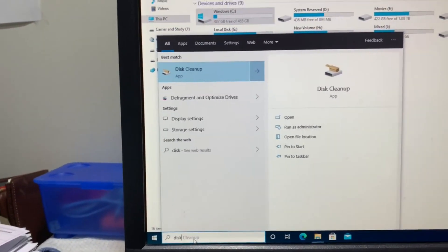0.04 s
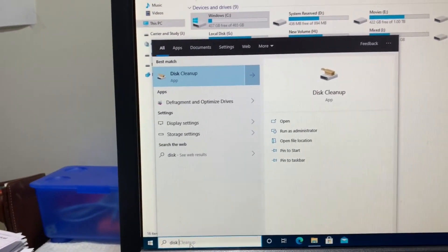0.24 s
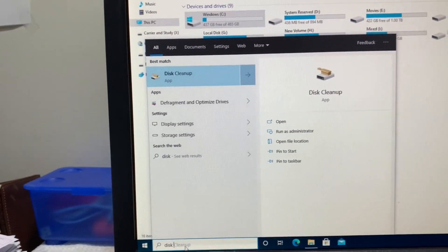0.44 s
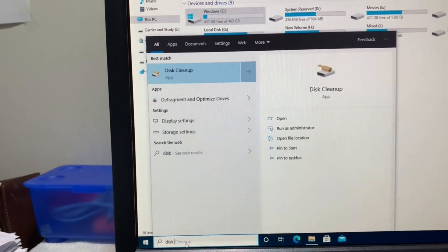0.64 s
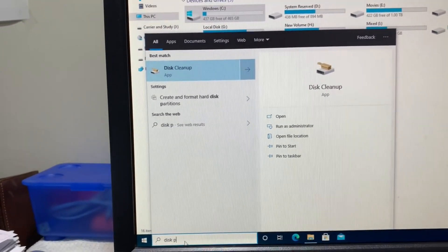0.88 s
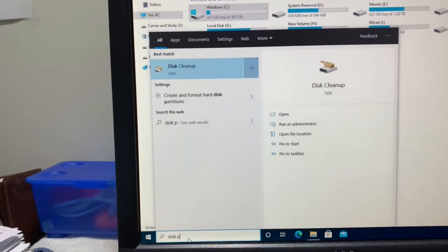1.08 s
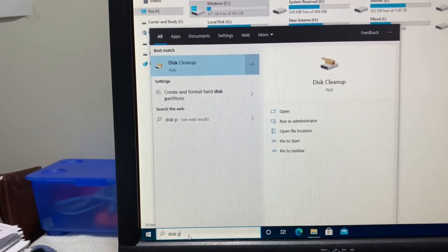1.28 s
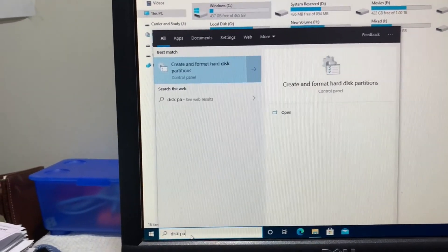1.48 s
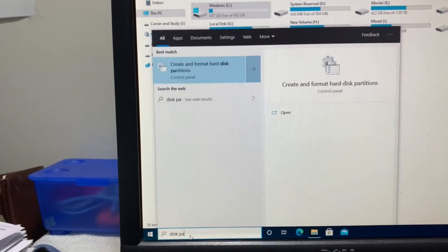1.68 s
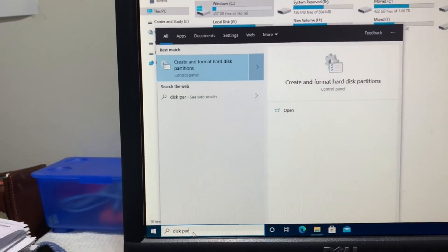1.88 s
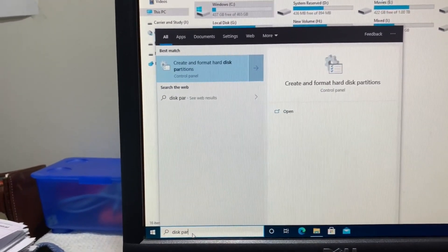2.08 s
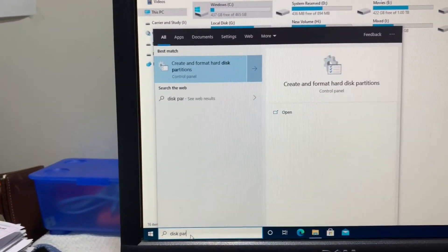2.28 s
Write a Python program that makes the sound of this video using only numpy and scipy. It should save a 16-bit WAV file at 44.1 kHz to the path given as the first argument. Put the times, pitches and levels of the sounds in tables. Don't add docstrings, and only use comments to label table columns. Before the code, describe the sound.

A few computer keys are pressed one after another, each with a sharp knock, loose rattle and dull desk thud, over low room rumble, soft hiss and faint fan whine, picked up close in stereo.

```python
import sys
import numpy as np
from scipy import signal
from scipy.fft import rfft, irfft, next_fast_len
from scipy.io import wavfile
from scipy.ndimage import uniform_filter1d, map_coordinates

SR = 44100
rng = np.random.default_rng(int(sys.argv[2]) if len(sys.argv) > 2 else 0)


def wrap_up_sound(samples):
    columns = np.atleast_2d(samples).T
    tamed = np.clip(columns, -1, 1)
    steps = np.round(tamed * 32767).astype(np.int16)
    wavfile.write(sys.argv[1], SR, steps)


def natural_amplitude(level_db):
    exponent = np.asarray(level_db, float) / 20
    return 10 ** exponent


N = 102664


def unit(x):
    return x / np.sqrt(np.mean(x ** 2) + 1e-20)


def along(points, hz):
    f, value = np.transpose(points)
    return np.interp(np.log(hz + 1), np.log(f + 1), value)


def wobble(rate):
    knots = rng.standard_normal(int(N * rate / SR) + 4)
    return map_coordinates(knots, [np.arange(N) * rate / SR])


def filtered(x, response):
    n = x.shape[-1]
    m = next_fast_len(n + min(n, SR // 2))
    return irfft(rfft(x, m) * response(np.fft.rfftfreq(m, 1 / SR)), m)[..., :n]


def body(modes, shift=1, change_db=0, top_hz=30000, foot_hz=1):
    center, width, db = np.transpose(modes)[:, :, None]
    sign = (-1) ** np.arange(len(center))[:, None]
    gain = natural_amplitude(db + np.reshape(change_db, (-1, 1))) * sign
    center = center * np.reshape(shift, (-1, 1))

    def response(f):
        ring = gain * 1j * f * width / (center * center - f * f + 1j * f * abs(width))
        dull = 1 / (1 + 1j * f / top_hz) ** 3
        thin = (f / (f - 1j * foot_hz)) ** 3
        return ring.sum(0) * dull * thin
    return response


def rush(spectrum, alike):
    def response(hz):
        turn = np.arccos(np.clip(along(alike, hz), -1, 1)) / 2
        return natural_amplitude(along(spectrum, hz)) * [np.cos(turn), np.sin(turn)]
    mid, side = filtered(rng.standard_normal((2, N)), response)
    return unit(np.array([mid + side, mid - side]))


def add(track, s, sound):
    track[round(s * SR):][:len(sound)] += sound


def knocks(rows):
    out, t = np.zeros(N + SR), np.arange(SR // 3) / SR
    for s, db, hz, t60 in rows:
        start = 1 - np.exp(-t * hz * 2)
        add(out, s, -natural_amplitude(db - 60 * t / t60) * np.sin(2 * np.pi * hz * t) * start)
    return out[:N]


# (pitch [Hz], level [dB per Hz])
AIR = [(12, -40.5), (20, -8.5), (75, -0.5), (145, -8.5), (188, -11), (225, -21.5), (274, -19.5), (387, -34),
       (1000, -41), (1300, -33.5), (2200, -120)]
# (pitch [Hz], level [dB per Hz])
HISS = [(410, -40), (700, -10), (737, -21.5), (1280, -7.5), (1450, -35.5), (13300, -27), (15800, -24.5)]
# (pitch [Hz], level [dB], unsteadiness [Hz])
WHINE = [(1271, -86, 14), (772, -98, 5.5)]
# (pitch [Hz], likeness [0-1])
ALIKE = [(60, 1), (250, 0.7), (700, 0.4), (3000, .02)]


def quiet_room():
    air_db, hiss_db, whine_sway_db = -55.5, -79.5, 2.5
    t = np.arange(N) / SR
    rumble = natural_amplitude(air_db + 1.5 * wobble(11.0)) * rush(AIR, ALIKE)
    hiss = natural_amplitude(hiss_db) * rush(HISS, ALIKE)
    fan = np.zeros(N)
    for hz, db, width in WHINE:
        turns = hz * t + np.cumsum(wobble(25.55)) * width / SR
        fan += natural_amplitude(db + whine_sway_db * wobble(8.0)) * np.sin(2 * np.pi * turns)
    return rumble + hiss + fan


# (time [s], level [dB])
SLIDE = [(0.0, -76), (0.07, -86.5), (0.238, -76), (0.63, -94), (0.74, -85.5), (0.918, -74), (1.04, -86.5),
         (1.13, -84.5), (1.27, -82), (1.36, -87.5), (1.71, -83), (1.87, -89.5), (2.32, -89)]
# (pitch [Hz], level [dB per Hz])
SKIN = [(290, -18.5), (500, -14.5), (611, -9.5), (2760, -12.5), (6180, -23.5), (9240, -21.5), (10800, -22),
        (12500, -24), (15500, -24.5)]


def slide():
    slide_db, grain_db = 9, 1.2
    s, db = np.transpose(SLIDE)
    level = np.interp(np.arange(N) / SR, s, db)
    above = np.sqrt(np.clip(natural_amplitude(2 * level) - natural_amplitude(2 * db.min()), 0, None))
    grain = natural_amplitude(slide_db + grain_db * wobble(39.6))
    return above * grain * rush(SKIN, [(500, 0.27), (3000, 0.055)])


# (time [s], level [dB], pitch [Hz], time to fall 60 dB [s])
TICKS = [(.0155, -46, 2360, 0.016), (.0222, -52, 1180, 0.0047), (.1175, -31.5, 1800, 0.0085),
         (.1297, -25.5, 985, 0.014), (.1345, -24, 1424, 0.024), (.139, -23.5, 1455, 0.0091),
         (.5005, -39, 2860, 0.014), (.5012, -51, 3450, 0.022), (.506, -38.5, 1400, 0.01),
         (.5255, -47.5, 3300, 0.027), (.5305, -31.5, 735, 0.024), (.6435, -58, 3210, 0.061),
         (.6582, -40, 920, 0.015), (.6675, -42.5, 3220, 0.019), (.6676, -33.5, 9330, 0.0062),
         (1.0822, -28.5, 3290, 0.0054), (1.0821, -34.5, 3930, 0.0058), (1.0838, -32.5, 2880, 0.0051),
         (1.088, -46.5, 2950, 0.035), (1.0882, -41, 944, 0.018), (1.159, -41, 1050, 0.016),
         (1.2895, -37.5, 3390, 0.0085), (1.299, -36.5, 1240, 0.013), (1.5605, -44, 4300, 0.013),
         (1.2985, -41, 8700, 0.009), (1.629, -25.5, 1116, 0.0092), (1.629, -36, 1630, 0.01),
         (1.7147, -18.5, 1800, 0.0017), (1.7284, -21.5, 860, 0.0037), (1.909, -62, 3400, 0.03)]


def ticks():
    return knocks(TICKS)


# (time [s], cap level [dB], case over cap [dB], stem fizz over cap [dB], rattle
# length [s])
CONTACTS = [(0.0169, -56.5, 8.5, -3, 0.0054), (0.0204, -53.5, 15, -33, 0.014),
            (0.0353, -55.5, 14.5, -27, 0.0019), (0.0496, -71, 22, -47, 0.01),
            (0.074, -58, 13, -43.5, 0.0043), (0.092, -56, 11, -24, 0.011),
            (0.116, -47.5, -7.5, -30.5, 0.0018), (0.1306, -32.5, 3.5, 1.5, 0.0016),
            (0.1326, -32.5, 1.5, 5.5, 0.0051), (0.14, -39.5, 2.5, 2, 0.0069),
            (0.492, -59.5, -1, -7.5, 0.0066), (0.5025, -49, -1.5, -11.5, 0.006),
            (0.523, -52.5, 2, -15, 0.012), (0.5332, -52.5, 6, -27, 0.0022), (0.55, -61, 11.5, -17, 0.0037),
            (0.562, -68.5, 15.5, -30, 0.0038), (0.581, -66.5, 16.5, -22.5, 0.01),
            (0.642, -62.5, 3, -14, 0.006), (0.657, -48.5, 0, -13, 0.0033), (0.6676, -46, 8, 3.5, 0.0016),
            (0.671, -63, 12, -2.5, 0.006), (1.0814, -42, -9.5, -17, 0.0018),
            (1.087, -43.5, -16, -23, 0.0026),
            (1.1319, -59.5, 4, -22.5, 0.0094), (1.1535, -52, 1.5, -5, 0.012), (1.1531, -53.5, 4.5, -25, 0.005),
         (1.1738, -52.5, 1.5, -9.5, 0.0063), (1.2042, -55, 9, -39, 0.0038), (1.2404, -61, 7.5, -37, 0.0052),
         (1.2504, -63, 10.5, -23, 0.0087), (1.264, -52, 2, -13, 0.0053), (1.275, -50, -1.5, -13, 0.012),
         (1.289, -47, 0, -13, 0.0096), (1.2977, -50, 2.5, -10, 0.0023), (1.307, -58.5, 15, -15.5, 0.0052),
         (1.3208, -55, -7, -14, 0.004), (1.5454, -43.5, 3, -9.5, 0.0053), (1.5578, -42.5, 0, -11, 0.0021),
         (1.5755, -57.5, 8.5, -16, 0.009), (1.5935, -59.5, 15, -24, 0.0047),
         (1.6279, -53.5, 3.5, -6.5, 0.0016), (1.6514, -82, 7, -19, 0.0029),
         (1.712, -38.5, -2.5, -41, 0.0067), (1.7262, -50.5, 3, 5, 0.0073), (1.732, -49.5, 5.5, -11, 0.0035),
         (1.9083, -61.5, -1.5, -33, 0.0028)]
# (pitch [Hz], width [Hz], level [dB])
CAP = [(2580, 410, 5), (2940, 153, 5.5), (3450, 1000, 3), (4306, 1500, -7)]
# (pitch [Hz], width [Hz], level [dB])
CASE = [(398, 161, -7.5), (604, 48, -3), (783, 79, -4), (992, 90, -2), (1368, 600, -6)]
# (pitch [Hz], width [Hz], level [dB])
STEM = [(6125, 830, 4.5), (7010, 620, 6.5), (8480, 400, 3.5), (9700, 1100, -0.5), (11460, 740, 1),
        (15700, 700, -1.5)]


def keys():
    key_spread, mode_spread_db = 0.027, 2
    spiky, rise_s = 2.25, 0.00017
    lead_s, lead_db, lead_room_s = 0.0033, -8, 0.025
    out, t = np.zeros(N + SR), np.arange(SR // 8) / SR - lead_room_s
    after = np.clip(t, 0, None)
    scrape = natural_amplitude(lead_db) * np.exp(-abs(t) / lead_s)
    for s, db, case_db, fizz_db, length in CONTACTS:
        noise = rng.standard_normal(len(t))
        landing = (1 - np.exp(-after / rise_s)) * np.exp(-after / max(length, 0.0005))
        rattle = np.sign(noise) * abs(noise) ** spiky * (landing + scrape)
        parts = [(CAP, 3, 5920, 1800),  # modes, level dB, dull above Hz, thin below Hz
                 (CASE, 4 + case_db, 1910, 1),
                 (STEM, 4.5 + fizz_db, SR, 4350)]
        for modes, level_db, top_hz, foot_hz in parts:
            shift, change = rng.standard_normal((2, len(modes)))
            response = body(modes, 1 + key_spread * shift, mode_spread_db * change, top_hz, foot_hz)
            ring = filtered(rattle, response)
            add(out, s, natural_amplitude(db + level_db) * ring / abs(ring).max())
    return out[round(lead_room_s * SR):][:N]


# (time [s], level [dB], push pitch [Hz], time to fall 60 dB [s])
THUMPS = [(.027, -36, 277, 0.02), (0.038, -22, 118, 0.037), (.135, -26, 379, 0.043), (.141, -32, 406, 0.05),
          (.185, -37, 152, .08), (.5345, -37, 457, 0.042), (0.532, -33, 316, 0.029),
          (0.546, -26.5, 110.6, 0.045), (0.671, -44.5, 297, 0.034), (.674, -42.5, 400, 0.045),
          (0.678, -32, 96, 0.044), (1.168, -23.5, 98.9, 0.048), (1.172, -42.5, 264, 0.054),
          (1.206, -30.5, 132, 0.029), (1.258, -44, 93, 0.11), (1.303, -57, 326, 0.031),
          (1.563, -25, 464, 0.0097), (1.583, -29, 98.5, 0.056), (1.751, -36.5, 104, 0.057)]
# (pitch [Hz], width [Hz], level [dB])
DESK = [(67.4, 19.5, -7.5), (104.4, 8.7, -8.5), (121, 5.3, -2.5), (200, 16, -24), (233, 37.5, 1.5),
        (312, 28, -40)]


def thumps():
    push = knocks(THUMPS)
    return push + natural_amplitude(4) * filtered(push, body(DESK))


# (pitch [Hz], time to fall 60 dB [s])
ROOM = [(150, 0.49), (500, 0.16), (1400, 0.16), (4000, 0.15), (10000, 0.12)]
# (pitch [Hz], weight)
SHARED = [(200, 0.78), (500, 0.11), (1100, 0.3), (2000, 0.059)]


def room(x):
    out, step = np.zeros((2, N + SR)), SR // 20
    delay = 150
    for start in range(0, N, step):
        hz, t, z = signal.stft(rng.standard_normal((2, SR // 3)), SR, nperseg=256)
        z = z + along(SHARED, hz)[:, None] * z.sum(0)
        fade = natural_amplitude(-60 * t / along(ROOM, hz)[:, None])
        tail = signal.istft(z * fade, SR, nperseg=256)[1]
        wet = signal.fftconvolve(x[None, start:start + step], tail / np.linalg.norm(tail[0]), axes=1)
        out[:, start + delay:start + delay + wet.shape[1]] += wet
    return out[:, :N]


# (pitch [Hz], lead [radians])
LEAD = [(80, 0.31), (300, 0.83), (900, 0.87), (1400, 0.9), (2100, 1.7), (3100, 0.63), (4200, 1.81),
        (6300, 0.4)]


def direct(x):
    lag_s, reach_s = 0.00013, 1.6
    sides = np.array([[1], [-1]])
    first = filtered(x, lambda hz: np.exp(0.5j * along(LEAD, hz) * sides))
    later = filtered(x, lambda hz: np.exp(1j * np.pi * hz * lag_s * sides))
    return np.where(np.arange(N) < reach_s * SR, first, later)


def scene():
    background = quiet_room() + slide()
    clicks = ticks() + keys()
    thud = thumps()
    walls = natural_amplitude(-9) * room(clicks + natural_amplitude(-3.5) * thud)
    return background + direct(clicks + thud) + walls


# (pitch [Hz], left over right [dB])
PORTS = [(60, -4), (200, -3), (700, -1.5), (1300, -2), (4000, -1), (5500, -2), (6500, -1.5)]


def microphone(dry):
    low_cut_hz, top_hz = 37, 16000

    def response(hz):
        balance = natural_amplitude(along(PORTS, hz) / 2 * [[1], [-1]])
        return balance / (1 + (hz / top_hz) ** 200) / (1 + (low_cut_hz / (hz + 1)) ** 4)
    return filtered(dry, response)


# (from [Hz], to [Hz], difference share [0-1])
STEERED = [(8100, 9150, .998), (10250, 11950, .002), (12500, 14300, .998), (15100, 17000, .002)]
STEER_FROM_HZ = 7600


def steer(hz):
    edge_width_hz = 70
    share = 0.5
    for lo, hi, target in STEERED:
        rise, fall = [0.5 + 0.5 * np.tanh((hz - edge) / edge_width_hz) for edge in (lo, hi)]
        share = share + (target - 0.5) * (rise - fall)
    return np.clip(share, 0, 1)


def treble(ports, grip):
    def response(hz):
        share = np.clip(0.5 + grip * (steer(hz) - 0.5), 0, 1)
        return 1 / (1 + (STEER_FROM_HZ / (hz + 1)) ** 60) * np.sqrt([1 - share, share])
    mid, side = filtered(ports, response)
    side = np.roll(side, SR // 1000)
    return np.array([mid + side, mid - side])


def top_cut(x):
    return signal.sosfilt(signal.butter(12, 17100, fs=SR, output="sos"), x)


def record(dry):
    let_go_s, let_go_grip = 0.01, 0.75
    ports = microphone(dry)
    low = filtered(ports, lambda hz: 1 / (1 + (hz / STEER_FROM_HZ) ** 60))
    firm, loose = treble(ports, 1), treble(ports, let_go_grip)
    power = abs(uniform_filter1d((firm ** 2).mean(0), round(let_go_s * SR)))
    loosened = power ** 2 / (power ** 2 + natural_amplitude(-405.65))
    return top_cut(low + firm + loosened * (loose - firm))


dry = scene()
out = record(dry)
wrap_up_sound(out)
```